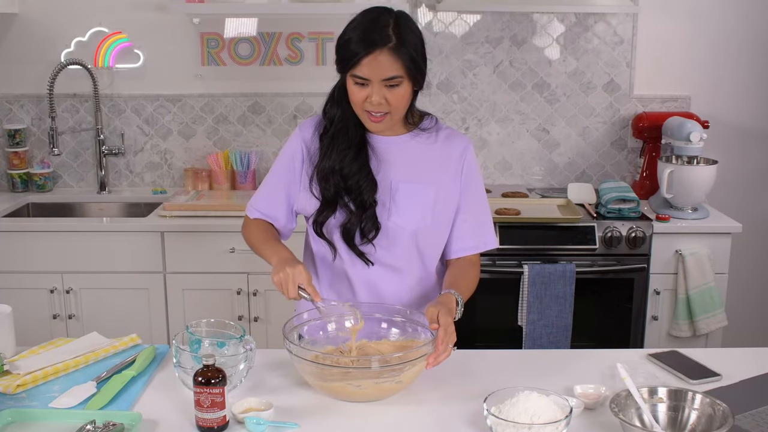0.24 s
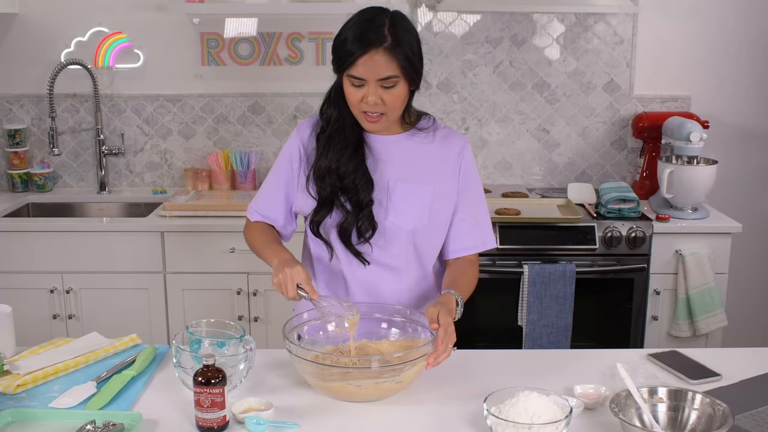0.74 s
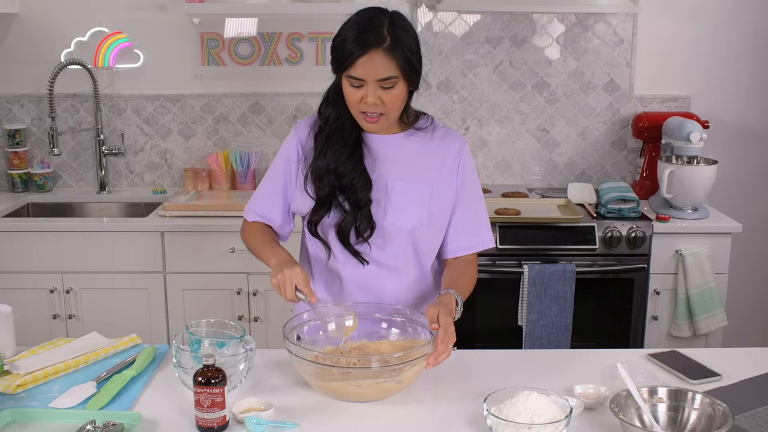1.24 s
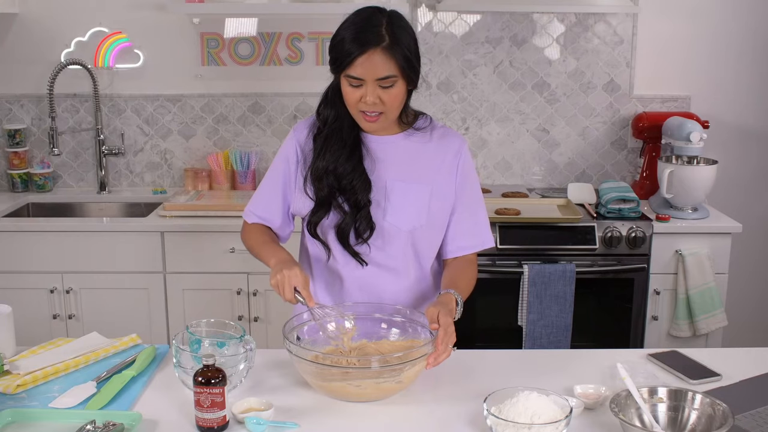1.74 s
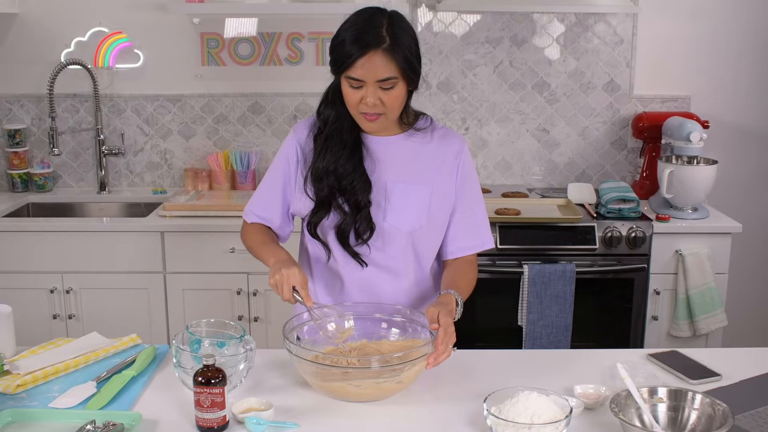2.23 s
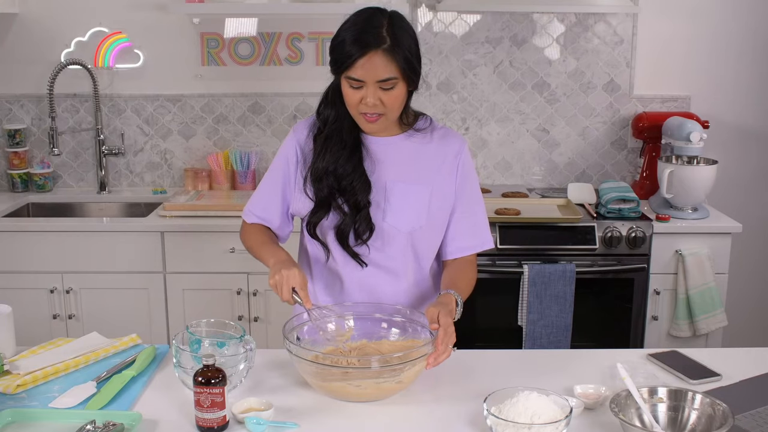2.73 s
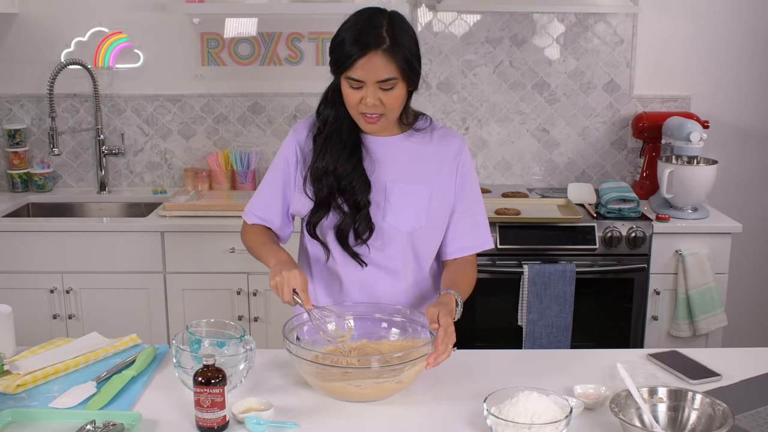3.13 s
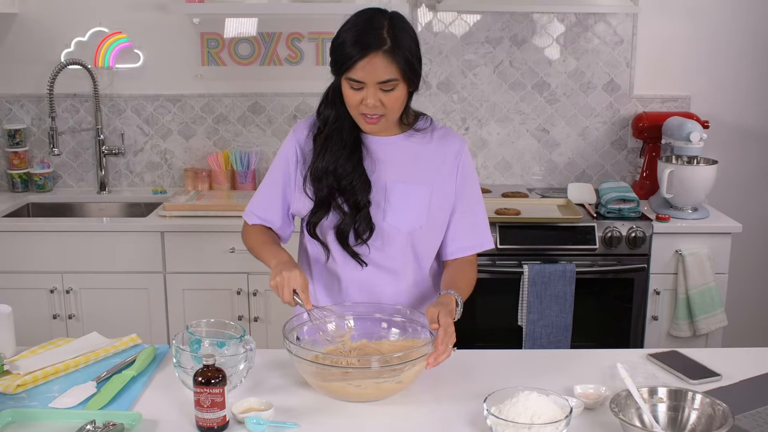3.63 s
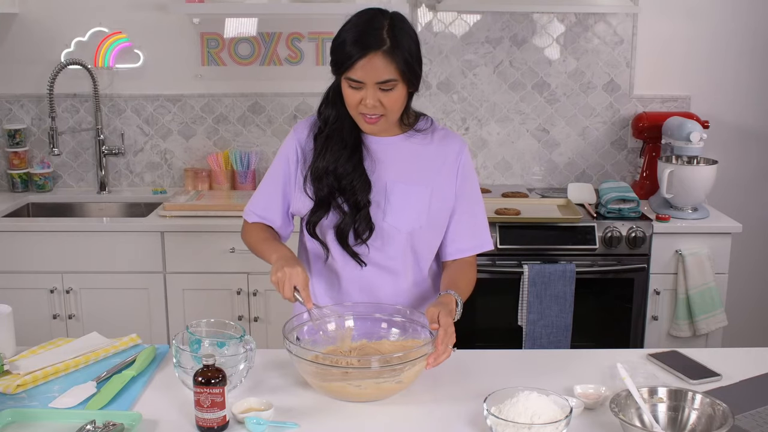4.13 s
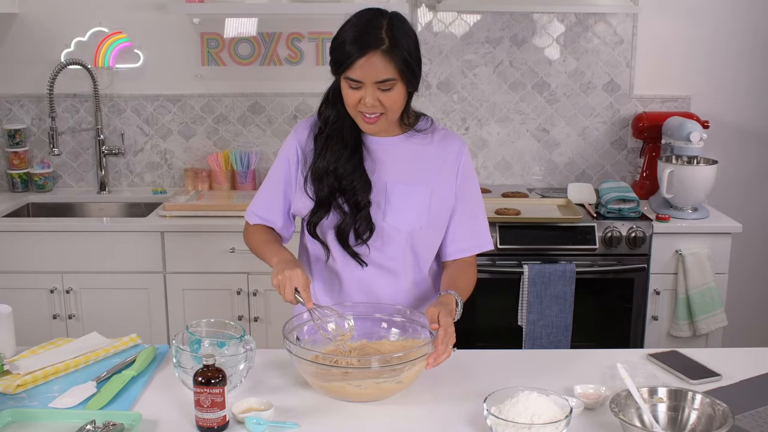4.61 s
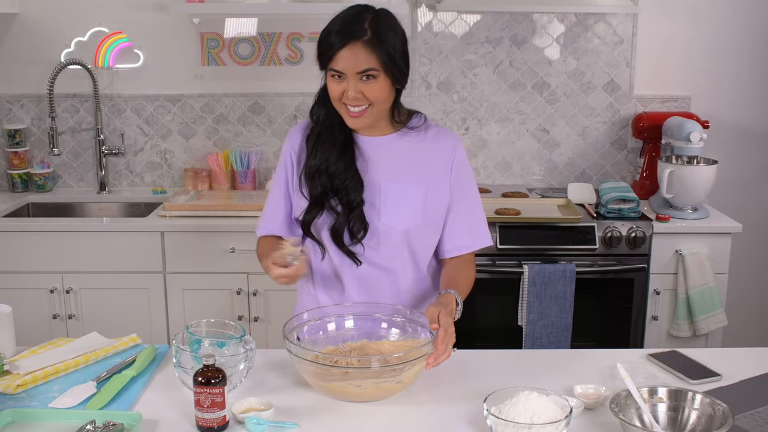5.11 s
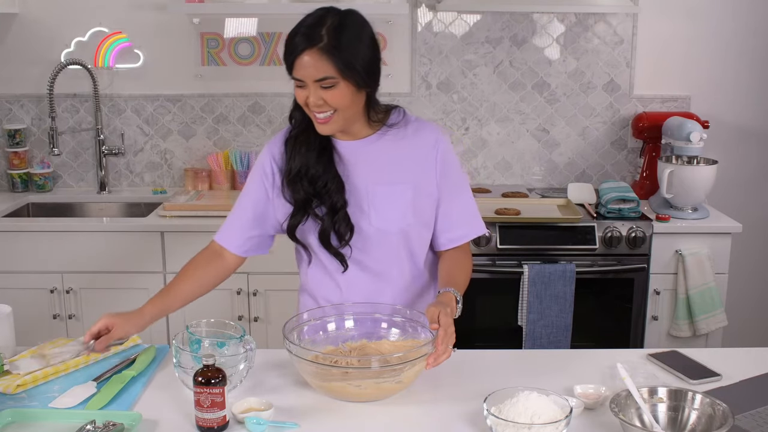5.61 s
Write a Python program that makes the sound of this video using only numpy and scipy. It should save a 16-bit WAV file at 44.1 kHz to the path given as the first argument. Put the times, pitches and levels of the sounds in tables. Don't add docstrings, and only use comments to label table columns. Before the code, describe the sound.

A stereo microphone a few metres away in a hard-walled kitchen, with low steady room air, hiss and faint fridge hum throughout. At 0 s wires graze a small glass dish, running straight into the first and brightest whisk tap on a glass bowl of batter. Taps then continue evenly, roughly every 0.2 s, until 2.4 s. Each is a crisp wiry rattle with a very short metallic ring, a dry, dull glassy thud, and usually a tiny knock as the bowl foot lands on the counter. Very soft scrapes along the rim come near 0.3 and 0.7 s. The rhythm loosens with taps at 2.7 and 3.0 s, a solitary knock at 3.5 s, and a strong bright one at 4.2 s with a lighter contact right behind it. Short echoes fade within half a second. Tiny ticks follow at 4.4 to 5.2 s, then a barely audible high tinkle near 5.8 s as the whisk is laid aside.

```python
import sys
import numpy as np
from scipy import signal
from scipy.fft import rfft, irfft
from scipy.io import wavfile
from scipy.ndimage import uniform_filter1d

SR = 44100
rng = np.random.default_rng(int(sys.argv[2]) if len(sys.argv) > 2 else 0)


def level_to_linear(level):
    exponent = np.asarray(level, float) / 20
    return 10 ** exponent


def to_wav(s):
    ch = np.atleast_2d(s).T
    pcm = np.round(np.clip(ch, -1, 1) * 32767)
    wavfile.write(sys.argv[1], SR, pcm.astype(np.int16))


N = 258205

# (time [s], blow level [dB], crack level [dB],
# flight of the bowl foot [ms, 0 = stays down], thin wire tips level [dB])
RIM_TAPS = [(0.029, -7, -5.5, 17, -35), (0.247, -6, -14, 15.5, -35), (0.493, -7.5, -17, 13.5, -34.5),
            (0.723, -5, -14, 15.5, -33.5), (0.944, -7, -17, 14, -29), (1.155, -8, -16, 14.5, -32.5),
            (1.371, -4, -10.5, 14, -42), (1.584, -6.5, -13, 12.5, -33), (1.784, -7.5, -12.5, 12.5, -43),
            (1.98, -8, -14, 12.5, -37), (2.185, -8, -13.5, 16, -35), (2.402, -8, -16.5, 0, -39),
            (2.73, -6.5, -16, 0, -45), (2.962, -4.5, -13, 14.0, -35), (3.507, -5, -12.5, 0, -36),
            (4.176, -4.5, -8.5, 16.5, -25.5)]
# (frequency [Hz], level [dB], T60 [s])
BOWL_MODES = [(151.6, -8.5, 0.031), (224, -23.5, 0.098), (318.4, -10.5, 0.046), (487.3, -6, 0.035),
              (610, -10, 0.02), (752, 8, 0.0096), (1174, -1.5, 0.015), (1367, 2.5, 0.0099),
              (1736, 3, 0.013), (2023, -1.5, 0.012), (2368, -8, 0.058), (2756, -6, 0.015),
              (3260, 1.5, 0.0034)]


def whisk_taps():
    # (frequency [Hz], level [dB], T60 [s])
    wire_modes = [(3987, -17, .07), (5030, -19.5, .052), (6215, -9, .04), (7457, -11, .06),
                  (2130, -18, .04), (8790, -18, .02), (10170, -13, .028), (11700, -20, .016)]
    # (frequency [Hz], level [dB], T60 [s])
    loop_modes = [(2443, -13, 0.024), (3046, -15.5, 0.022), (5865, -15.5, 0.038), (7300, -43, 0.004),
                  (8080, -10, 0.018), (8300, -23, 0.02), (9400, -40, 0.0096)]
    # (frequency [Hz], level [dB], T60 [s])
    tip_modes = [(10950, -30, 0.01), (12600, -18, 0.016), (13350, -38, 0.0083), (14800, -4.5, 0.027)]
    spots = [.713, .839, .323, .513, .632, .51, .683, .436, .615, .49, .575, .58, .567, .904, .272, .578]
    ring_db, snap_db = -1.5, 1
    lead_s = .0035
    out = np.zeros(N)
    t = np.arange(SR // 2) / SR
    landing = np.exp(np.minimum(t - .005, 0) / .0007)
    for (s, blow_db, crack_db, _, tip_db), spot in zip(RIM_TAPS, spots):
        wires = bundle(struck(wire_modes, spot, crack_db + ring_db), detune=0.0052, linger_db=-18)
        loose = [(hz, db + crack_db, t60) for hz, db, t60 in loop_modes]
        loose += struck(tip_modes, spot, tip_db)
        rings = wires + bundle(loose, detune=0.01, linger_db=-31)
        add(out, s - lead_s, rings * landing)
        crack = level_to_linear(crack_db - 9.5) * rattle(1.0, 6.1)
        snap = level_to_linear(tip_db + snap_db) * rattle(1.3, 3.1, top_hz=15100)
        add(out, s - lead_s, crack + snap)
        add(out, s + 0.001081, -level_to_linear(blow_db - 1.0) * thud(BOWL_MODES, 0.28))
    return out


def struck(modes, spot, db):
    bend_hz, node_leak = 56.25, .17
    out = []
    for hz, own_db, t60 in modes:
        half_waves = np.sqrt(hz / bend_hz)
        swing = np.sin(np.pi * spot * half_waves) ** 2 + node_leak ** 2
        out.append((hz, db + own_db + 10 * np.log10(swing), t60))
    return out


def bundle(modes, detune, linger_db):
    out = np.zeros(SR // 2)
    spread = rng.standard_normal((len(modes), 3)) * (.3, .3, .0006)
    for (hz, db, t60), (a, b, c) in zip(modes, spread):
        upper = ring(hz * (1 + detune * (1 + a)), db - 2, t60)
        lower = ring(hz * (1 - detune * (1 + b)), db - 2, t60)
        add(out, 0, ring(hz, db, t60) + upper + lower)
        add(out, 0, ring(hz * (1 + c), db + linger_db, 6 * t60))
    return out


def ring(hz, db, t60):
    t = np.arange(int(t60 * SR)) / SR
    return level_to_linear(db) * np.sin(2 * np.pi * hz * t) * np.exp(-np.log(1000) * t / t60)


def add(track, s, sound):
    i = max(int(s * SR), 0)
    track[i:i + len(sound)] += sound[:len(track) - i]


def rattle(rise_ms, fall_ms, top_hz=9000):
    t = np.arange(int(.04 * SR)) / SR * 1000 - 5
    ticks = rng.standard_normal(len(t)) * level_to_linear(1.6 * rng.standard_normal(len(t)))
    ticks = ticks * np.exp(np.minimum(t / rise_ms, -t / fall_ms))
    return signal.sosfilt(signal.butter(2, [4700, top_hz], "band", fs=SR, output="sos"), ticks)


def thud(modes, contact_ms):
    chance = rng.standard_normal((len(modes), 2)) * (.02, 1.8)
    body = np.zeros(SR // 10)
    for k, ((hz, db, t60), (a, b)) in enumerate(zip(modes, chance)):
        add(body, 0, (-1) ** (k // 2) * ring(hz * (1 + a), db + b, t60))
    push = np.hanning(int(contact_ms * SR / 1000) + 3)
    radiation = signal.butter(2, 290, "high", fs=SR, output="sos")
    sound = signal.sosfilt(radiation, np.convolve(body, push))
    return sound / np.abs(sound).max()


def light_touches():
    # (time [s], blow level [dB], crack level [dB])
    touches = [
        (4.2209, -11, -23),
        (4.384, -43, -49),
        (4.762, -45.5, -53),
        (4.81, -48, -66),
        (4.855, -54, -55),
        (5.172, -75, -57),
    ]
    out = np.zeros(N)
    for s, blow_db, crack_db in touches:
        add(out, s, -level_to_linear(blow_db) * thud(BOWL_MODES, 0.22))
        add(out, s - .005, level_to_linear(crack_db) * rattle(0.48, 2.9))
    return out


def rocking_bowl():
    # (frequency [Hz], level [dB], T60 [s])
    counter_modes = [(136, -13, 0.041), (219, -13.5, 0.026), (305, -20, 0.015), (565, 2, 0.0072),
                     (1030, 5.5, 0.0041), (1590, 3, 0.0044)]
    rock_db, usual_ms, db_per_ms = -15.5, 13.6, 2.7
    out = np.zeros(N)
    for s, blow_db, _, flight_ms, _ in RIM_TAPS:
        if flight_ms <= 5:
            continue
        knock_db = blow_db + rock_db + db_per_ms * (flight_ms - usual_ms)
        knock = level_to_linear(knock_db) * thud(counter_modes, 0.36)
        land_s = s + flight_ms / 1000
        add(out, land_s - .001, knock)
        add(out, land_s + 0.00389, -1.1 * knock)
    return out


def opening_clink():
    # (time [s], level [dB])
    clinks = [
        (0, -23),
        (.005, -15),
        (.011, -17),
        (0.02, -21),
    ]
    # (frequency [Hz], level [dB], T60 [s])
    glass_modes = [(997, 2, 0.062), (1140, -17, 0.014), (1580, 4, 0.041), (1770, -27, .025),
                   (2550, -19, 0.03), (2690, 1, 0.038), (2940, -29, 0.035), (4090, -8.5, 0.018),
                   (4340, 4, 0.0054)]
    out = np.zeros(N)
    for s, db in clinks:
        glass = thud(glass_modes, .05)[:1700]
        wires = level_to_linear(-12) * rattle(0.37, 2.0)[:1700]
        add(out, s, level_to_linear(db) * (glass + wires))
    return out


def last_tinkle():
    # (time [s], frequency [Hz], level [dB], T60 [s])
    tinkles = [
        (5.765, 5500, -67, .06),
        (5.80, 9380, -64, .06),
        (5.765, 10700, -64, .05),
        (5.835, 9100, -57, 0.054),
    ]
    out = np.zeros(N)
    for s, hz, db, t60 in tinkles:
        add(out, s, ring(hz, db, t60))
    return out


def rim_drag():
    # (start [s], hold [s], level [dB])
    strokes = [
        (.32, 0.052, -44.5),
        (0.678, .03, -49.5),
    ]
    rise_db_s, fall_db_s = 186, 230
    t = np.arange(N) / SR
    scrape = shaped([(1500, -35), (3200, -5.5), (6000, -6), (9200, -6.5), (10500, -38)], N)
    grain = scrape * level_to_linear(2.0 * rng.standard_normal(N // 64 + 1).repeat(64)[:N])
    envelope = np.zeros(N)
    for s, hold, db in strokes:
        rise = rise_db_s * np.maximum(s - t, 0)
        fall = fall_db_s * np.clip(t - s - hold, 0, 1)
        envelope += level_to_linear(db - 6.5 - rise - fall)
    return grain * envelope


def shaped(points, size):
    hz, db = np.transpose(points)
    f = np.maximum(np.arange(size // 2 + 1) * SR / size, 1)
    gain = level_to_linear(np.interp(np.log(f), np.log(hz), db))
    x = irfft(rfft(rng.standard_normal(size)) * gain, size)
    return x / x.std()


def room():
    # (delay [ms], left factor [1], right factor [1])
    echoes = [(3.6, .4, .49), (4.9, .67, .68), (8.7, -.51, -.67), (11.8, .09, .79), (13.6, -.28, -.52),
              (16.9, .37, .4), (22.7, -.61, -.44), (26.7, .33, .48), (33.4, -.46, -.56), (37, -.38, -.16),
              (44.7, .47, .57), (46.3, .45, .26), (54.8, -.2, -.32), (69.6, .25, .42)]
    # (frequency [Hz], level [dB], T60 [s], left-right likeness [0-1])
    bands = [(121, -15.5, 0.33, 1), (232, -15, 0.47, 0.96), (520, -20, 0.41, 0.81), (1150, -21, 0.46, 0.46),
             (1800, -29, 0.54, 0), (4140, -25, 0.45, 0), (8100, -28.5, 0.4, 0.87), (13900, -30, 0.35, 1)]
    size = SR * 3 // 4
    t = np.arange(size) / SR
    octave = np.log2(np.maximum(np.arange(size // 2 + 1) * SR / size, 1))
    early = np.zeros((2, size))
    for ms, left, right in echoes:
        lead = round(12 * (abs(right) - abs(left)))
        early[[0, 1], int(ms * SR / 1000) + np.array([lead, -lead])] += left, right
    out = signal.lfilter([.4], [1, -.65], early)
    out += level_to_linear(-4) * early * np.exp(-t / .015)
    out[:, 0] = level_to_linear(3.5), level_to_linear(5.5)

    mid, side = rfft(rng.standard_normal((2, size)))
    centres = np.log2(np.array(bands)[:, 0])
    for k, (hz, db, t60, like) in enumerate(bands):
        share = np.interp(octave, centres, np.arange(len(bands)) == k)
        like = np.clip(like, 0, 1)
        common = np.sqrt((1 + like) / 2) * mid
        opposed = np.sqrt((1 - like) / 2) * side * np.array([[1], [-1]])
        build_up = 1 - np.exp(-t / 0.011)
        out += irfft((common + opposed) * share, size) * level_to_linear(db - 60 * t / t60) * build_up
    return out


def air():
    # (frequency [Hz], level [dB per Hz])
    spectrum = [(30, -3), (70, -3.5), (230, -9.5), (700, -13), (3500, -24.5), (7000, -31), (9500, -29.5),
                (15700, -33.5)]
    # (frequency [Hz], side minus mid [dB])
    side_tilt = [(60, -22), (200, -18), (700, -10.5), (1290, -9), (2380, -6), (4400, -3), (8120, -3),
                 (15000, -47)]
    # (frequency [Hz], level [dB])
    hum = [(70.0, -59), (118.4, -65.5), (188.4, -56.5), (236.9, -67)]
    hz, db = np.transpose(side_tilt)
    side = [(f, d + np.interp(np.log(f), np.log(hz), db)) for f, d in spectrum]
    mid_noise = shaped(spectrum, N)
    side_noise = level_to_linear(-5.5) * shaped(side, N) * np.array([[1], [-1]])
    out = level_to_linear(-51.5) * (mid_noise + side_noise)
    for f, d in hum:
        wobble = np.cumsum(uniform_filter1d(rng.standard_normal(N), 4000)) * 0.011
        out += level_to_linear(d) * np.sin(2 * np.pi * f * np.arange(N) / SR + wobble)
    return out


def scene():
    dry = whisk_taps() + light_touches() + rocking_bowl() + opening_clink() + last_tinkle() + rim_drag()
    wet = signal.fftconvolve(dry[None], room(), axes=1)[:, :N]
    return (wet + air()) * level_to_linear(np.array([[-.8], [.8]]))


def top_cut(x):
    return signal.sosfilt(signal.butter(12, 16510, fs=SR, output="sos"), x)


def record(dry):
    x = signal.sosfilt(signal.butter(3, 45, "high", fs=SR, output="sos"), dry)
    x = np.tanh(1.1 * x) / 1.1
    x = signal.sosfiltfilt(signal.ellip(6, .1, 30, 15750, fs=SR, output="sos"), x)
    treble = signal.ellip(6, .1, 50, 6900, "high", fs=SR, output="sos")
    width = signal.sosfiltfilt(treble, x[0] - x[1]) / 2
    power = uniform_filter1d(width ** 2, size=512)
    quiet = uniform_filter1d(1. * (power < level_to_linear(-58) ** 2), size=256)
    x = x - quiet * width * np.array([[1], [-1]])
    return top_cut(x)


dry = scene()
out = record(dry)
to_wav(out)
```